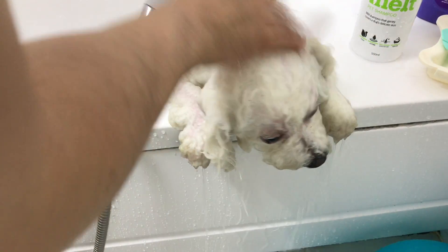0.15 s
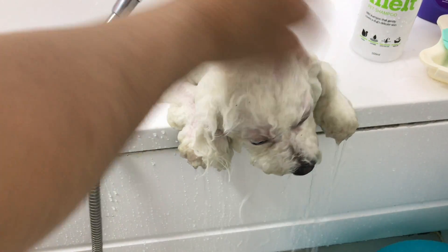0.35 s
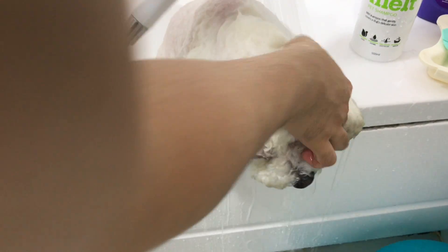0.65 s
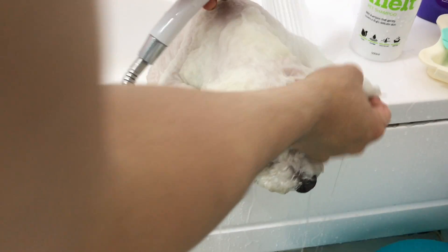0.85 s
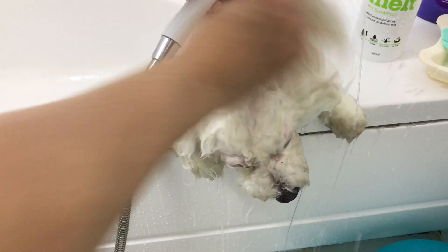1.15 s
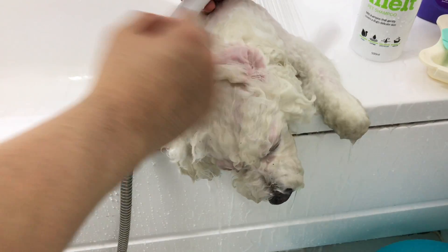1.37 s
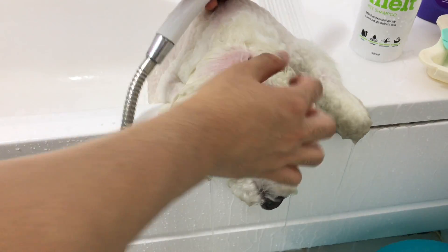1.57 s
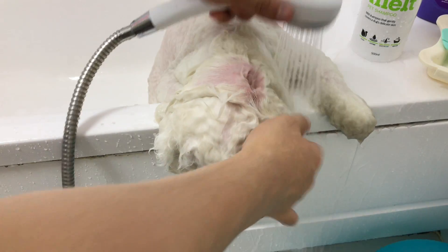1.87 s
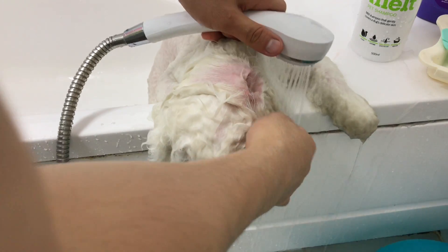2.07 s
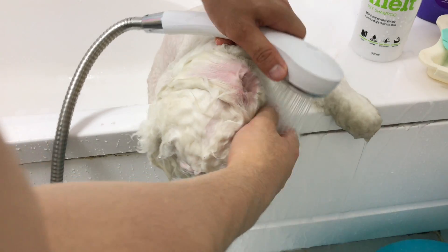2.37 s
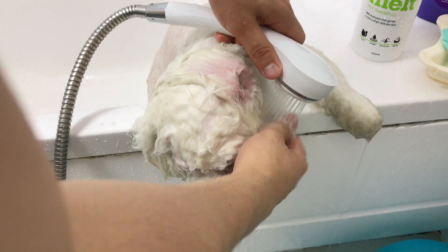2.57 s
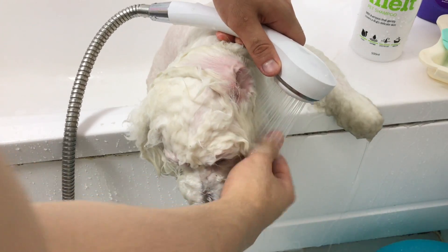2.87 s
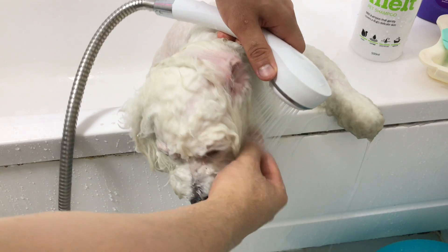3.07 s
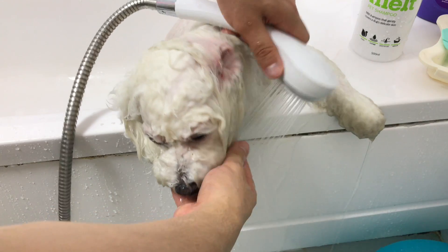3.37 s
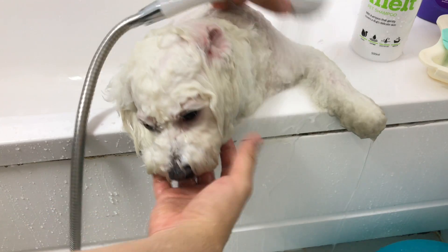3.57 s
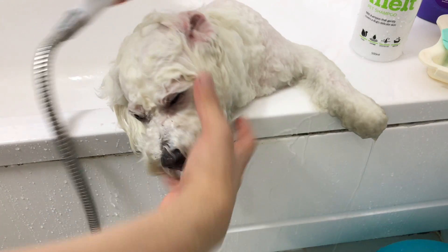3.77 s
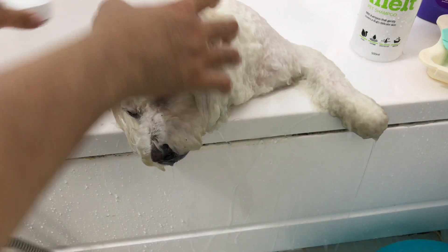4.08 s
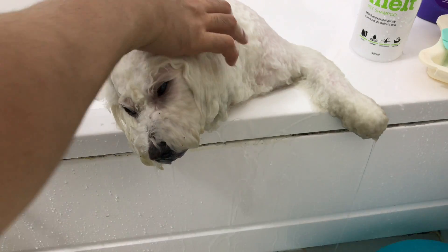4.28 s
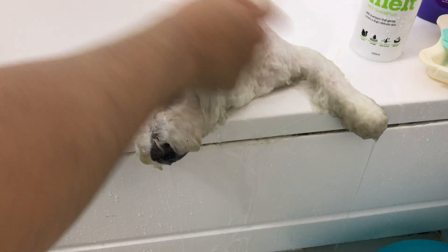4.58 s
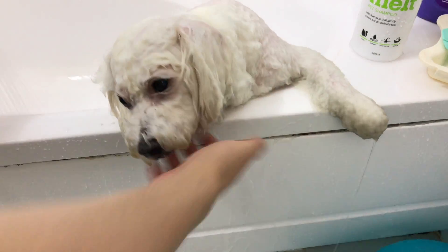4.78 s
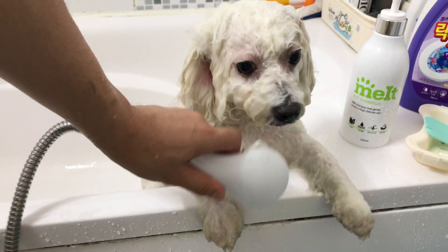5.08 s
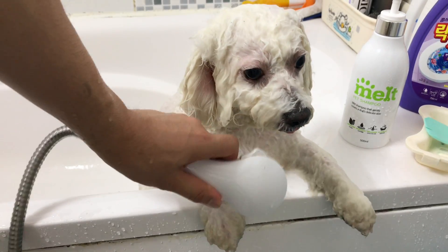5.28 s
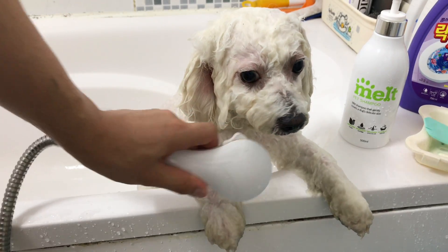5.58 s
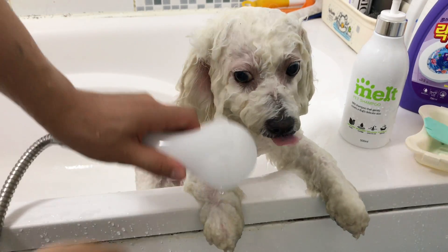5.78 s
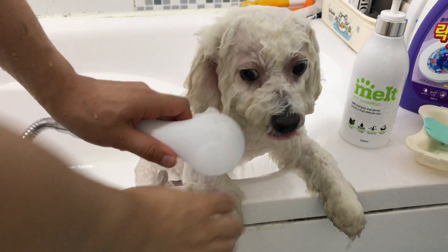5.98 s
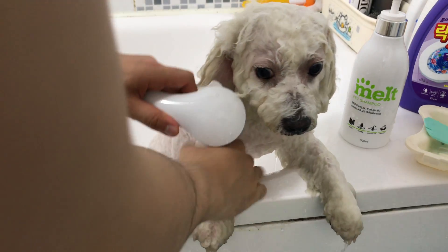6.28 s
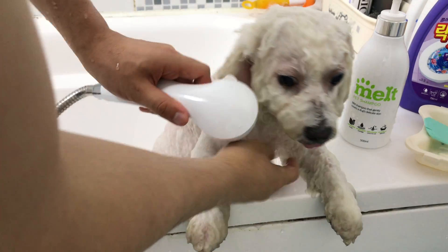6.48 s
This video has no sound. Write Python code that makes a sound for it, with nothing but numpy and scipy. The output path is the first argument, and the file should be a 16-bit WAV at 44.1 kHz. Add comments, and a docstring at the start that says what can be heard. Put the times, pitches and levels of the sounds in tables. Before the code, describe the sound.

Continuous shower spray on a small dog at a bathtub rim, heard close up and alike in both channels, with short tile echoes. Crackling splashes and hollow knocks come early, a steadier wash follows, then many wet slaps. After a very brief fade to near silence, the spray returns with a slightly ringing, duller patter on the coat, small bubbles and faint low rumble.

```python
"""A hand shower rinses a small dog at the rim of a bathtub in a tiled bathroom.
From the start nozzles hiss as shaped noise, jets patter on fur and enamel as droplet noise, and resonators
hum as the tub shell. Slaps of runoff and shell knocks crowd the first 0.8 s; slaps return from 1.4 to 4.3 s.
Near 4.9 s all fades out and in again; then fur patter rings at 2.8 kHz and no slaps follow. Bubbles gurgle,
water sloshes and a rumble lies below throughout, while sparse tile echoes answer the water."""
import sys
import numpy as np
from scipy import signal
from scipy.fft import rfft, irfft
from scipy.io import wavfile
from scipy.ndimage import uniform_filter1d

SR = 44100
rng = np.random.default_rng(int(sys.argv[2]) if len(sys.argv) > 2 else 0)


def dump_mix(stems):
    """Bounce the given channels to the path in sys.argv[1] as a 16-bit WAV at rate SR."""
    frames = np.atleast_2d(stems).T  # one column per channel
    limited = np.clip(frames, -1, 1)  # hard clip at full scale
    pcm = np.round(limited * 32767).astype(np.int16)
    wavfile.write(sys.argv[1], SR, pcm)


def level_to_linear(level):
    """Convert decibel levels to linear amplitude factors, elementwise."""
    exponent = np.asarray(level, float) / 20
    return 10 ** exponent


N = 292824  # samples
CUT_S = 4.871  # end of the fade out

# Jets on fur and hand: t/s, relative level/dB, centre f/Hz
FUR_JETS = [(0, -25, 2140), (.13, -34.5, 2000), (.3, -33.5, 2650), (.59, -33.5, 2670), (.72, -28.5, 2010),
            (1.46, -29.5, 1900), (1.9, -27.5, 1960), (1.98, -23.5, 1900), (2.14, -32.5, 1900),
            (2.42, -23.5, 2120), (2.9, -25.5, 2100), (3.08, -20.5, 2380), (3.21, -25.5, 2100),
            (3.35, -21.5, 1980), (3.5, -25.5, 2300), (3.59, -37, 2850), (3.68, -25, 2200),
            (3.82, -30, 2300), (4.01, -28.5, 2720), (4.12, -43, 2200), (4.22, -36.5, 1690),
            (4.3, -43, 1600), (4.45, -44, 2600), (4.88, -52, 2700), (4.89, -22.5, 2070), (5.14, -25, 2030),
            (5.25, -24, 2120), (6.02, -24.5, 2300), (6.4, -27, 1860), (6.64, -25.5, 1850)]


def evened(x):
    """Normalises mean power: scales to rms 1."""
    return x / np.sqrt(np.mean(abs(x) ** 2) + 1e-20)


def read(points, hz):
    """Interpolates a spectrum along logarithmic frequency, close to the ear's pitch scale."""
    f, value = np.transpose(points)
    return np.interp(np.log(hz + 1), np.log(f + 1), value)


def control(table, column, t):
    """Interpolates one column linearly in time: a slowly varying source parameter."""
    rows = np.array(table)
    return np.interp(t, rows[:, 0], rows[:, column])


def add(mix, s, sound):
    """Superposition: adds a sound to the mix at s seconds."""
    part = mix[round(s * SR):][:len(sound)]
    part += sound[:len(part)]


def band(x, hz, width):
    """Resonance of about unit gain: one complex pole, whose radius sets the bandwidth in Hz."""
    r = np.exp(-np.pi * width / SR)
    return 2 * signal.lfilter([1 - r], [1, -r * np.exp(2j * np.pi * hz / SR)], x).real


def waver(t, depth_db, top_hz):
    """Slow random modulation: sixteen sines of random phase, weaker as they get faster, depth rms in dB."""
    hz = np.geomspace(top_hz / 8, top_hz, num=16)
    turn = rng.random(16)
    sines = np.sin(2 * np.pi * (hz * t[::256, None] + turn)) / np.sqrt(hz)
    return depth_db * np.interp(t, t[::256], evened(sines.sum(axis=1)))


def shaped(x, shape_db, size, patchy_db):
    """Time-varying filtering: a dB field over frequency and time, with drifting random patches."""
    overlap = size * 3 // 4
    hz, t, z = signal.stft(x, SR, nperseg=size, noverlap=overlap)
    patches = rng.standard_normal(z.shape[::-1]).T
    patches = uniform_filter1d(patches, size=size // 64, axis=0)
    patches = evened(uniform_filter1d(patches, size=8192 // size, axis=1))
    shape = level_to_linear(shape_db(hz[:, None], t[None]) + 0 * t)
    shape = shape / np.sqrt((shape ** 2).mean(axis=0))  # the colour moves, the power stays
    z = z * shape * level_to_linear(patchy_db * patches)
    return evened(signal.istft(z, SR, nperseg=size, noverlap=overlap)[1][:N])


def droplets(per_s, spread_db, share):
    """Shot noise: random impacts of uneven size hold a share of the power over a smooth wash."""
    impacts = rng.random(N) < per_s / SR
    size = level_to_linear(spread_db * np.minimum(rng.exponential(1, N), 5)) * impacts
    # each impact fizzes for about half a millisecond
    splash = signal.lfilter([1], [1, -.95], size) * rng.standard_normal(N)
    share = np.clip(share, 0, 1)
    return np.sqrt(share) * evened(splash) + np.sqrt(1 - share) * rng.standard_normal(N)


def nozzles(t):
    """Jet breakup: fine jets split into droplets, giving a broadband bright hiss."""
    # Hiss spectrum: f/Hz, relative spectral level/dB
    hiss_spectrum = [(300, -16.5), (1500, -4.5), (4000, -2.5), (6500, 2), (9000, 1.5), (13000, 5.5),
                     (15700, 4.5)]
    # Loudness of the nozzles as the shower head turns: t/s, relative level/dB
    jet_levels = [(0, -21.5), (.13, -21), (.22, -25), (.41, -25.5), (.6, -26), (.76, -22), (1.0, -20),
                  (1.15, -23), (1.5, -22.5), (1.91, -19.5), (2.14, -23), (2.26, -18), (2.45, -20.5),
                  (2.65, -19), (3.2, -19.5), (3.67, -18), (3.92, -24), (4.2, -30.5), (4.47, -21.5),
                  (4.88, -22.5), (5.1, -20.5), (5.2, -21.5), (6.0, -22), (6.4, -23.5), (6.64, -20)]
    level_db = control(jet_levels, 1, t) + 2.0 + waver(t, depth_db=.9, top_hz=14)
    jets = droplets(per_s=3000, spread_db=4.0, share=0.19)
    return level_to_linear(level_db) * shaped(jets, lambda hz, s: read(hiss_spectrum, hz), size=512, patchy_db=1.17)


def patter(t):
    """Impact noise depends on the surface: a dull moving hump from fur and hand, brightness from enamel."""
    # Spectrum on enamel: f/Hz, relative spectral level/dB
    enamel_spectrum = [(1500, -18.5), (2800, -9), (3800, -0.5), (4500, 0.5), (6200, -7), (8000, -8),
                       (12000, -15)]
    # Jets on enamel: t/s, relative level/dB
    enamel_levels = [(0, -20.5), (.1, -20), (.2, -27), (.41, -23.5), (.59, -28.5), (.78, -28), (.9, -22),
                     (1.08, -31.5), (1.5, -28.5), (1.7, -37), (2.14, -26), (2.26, -21), (2.65, -23),
                     (2.9, -20.5), (3.4, -19.5), (3.6, -19), (3.85, -23), (4.01, -19.5), (4.16, -33),
                     (4.26, -40), (4.47, -22), (4.66, -28.5), (4.88, -27), (4.89, -34), (5.3, -28.5),
                     (5.65, -26), (6.0, -25.5), (6.3, -24), (6.64, -27)]
    gap_hz, gap_width_hz = 2760, 130

    def gap_db(hz):
        # with the head held close to the coat the gap rings and the patter ends in an edge
        ring = 3.5 * np.exp(-((hz - gap_hz) / gap_width_hz) ** 2)
        edge = -2.5 * np.clip((hz - gap_hz) / (2 * gap_width_hz), 0, 1)
        return ring + edge

    def fur_db(hz, s):
        octaves = abs(np.log2((hz + 30) / control(FUR_JETS, 2, s)))
        return -10. * octaves ** 1.55 + gap_db(hz) * (s > CUT_S)

    fur_level_db = control(FUR_JETS, 1, t) - 0.68 + waver(t, depth_db=0.64, top_hz=14)
    fur_drops = droplets(per_s=1500, spread_db=2.8, share=0.17)
    fur = level_to_linear(fur_level_db) * shaped(fur_drops, fur_db, size=512, patchy_db=1.37)
    enamel_level_db = control(enamel_levels, 1, t) - 3.0 + waver(t, depth_db=1.6, top_hz=14)
    enamel_drops = droplets(per_s=1500, spread_db=3.7, share=0.4)
    enamel = shaped(enamel_drops, lambda hz, s: read(enamel_spectrum, hz), size=512, patchy_db=2.5)
    return fur + level_to_linear(enamel_level_db) * enamel


def slaps():
    """Sheet impact: a crack and a short rising pop, a bounce off the tub wall, then thinning spray."""
    # Slaps of falling water: t/s, relative pop level/dB, nominal bubble f/Hz,
    # crack level relative to the pop/dB, initial spray level relative to the pop/dB
    slap_events = [(0.0942, -8, 6060, 0, -21), (0.13, -9, 6000, -8, -18), (0.172, -8, 7340, -8, -16),
                   (0.1852, -7, 3680, -11, -15), (0.2098, -10, 2520, -13, -28), (0.2224, -7, 2960, -6, -15),
                   (0.238, -12, 2760, -2, -23), (0.3584, -12, 6340, -8, -19), (0.369, -2, 2650, -9, -17.5),
                   (0.371, -10.5, 1610, -14, -16), (0.461, 0.5, 11040, -5.5, -25),
                   (0.543, -17, 3830, -8, -8), (0.5623, -10.5, 5890, -9, -14),
                   (0.606, -10.5, 2870, -10, -16), (0.7289, -2.5, 4760, -10, -19.5),
                   (1.4321, -14.5, 1660, 2, -14), (2.1558, -10.5, 7020, -11, -9),
                   (2.3171, -11.5, 3910, -8, -12), (2.3992, -9, 5800, -6, -15), (2.511, -10, 2260, -1, -14),
                   (2.622, -4, 3600, -14, -16), (2.7364, -5, 3740, 0, -19), (2.894, -1, 6000, -17, -21),
                   (2.9164, 0.5, 3550, -15, -14), (2.939, -3, 5340, -20, -17), (3.0377, -6, 3620, -15, -14),
                   (3.0475, -2, 2920, -8, -15), (3.1896, -5, 3870, -8, -22), (3.262, -5.5, 3500, -16, -26),
                   (3.3255, -0.5, 3130, -13, -20), (3.328, -5, 1500, -10, -18), (3.429, -10, 2900, -8, -18),
                   (3.3474, -14, 2240, -5, -21), (3.499, -6.5, 4350, -15, -12), (3.605, -7, 3960, -10, -13),
                   (3.6997, -8.5, 4150, -4, -8), (3.7984, -8.5, 5570, -7, -25),
                   (3.8339, -8.5, 3030, -3.5, -18), (3.94, 0, 3030, -17, -12.5),
                   (4.0316, -10, 3630, -8, -22), (4.061, -9, 9400, -7, -19), (4.091, -16, 5500, -8, -20),
                   (4.25, -19, 6000, -8, -21)]
    out = np.zeros(N)
    u = np.arange(SR // 4) / SR
    rise = 1 - np.exp(-u / 0.00028)
    noise = rng.standard_normal((len(slap_events), len(u)))
    for (s, db, hz, crack_db, spray_db), n in zip(slap_events, noise):
        cycles = hz * u * (.9 + 60 * np.minimum(u, .004))
        pop = 1.23 * np.sin(2 * np.pi * cycles) * np.exp(-u / 0.0012)
        crack = level_to_linear(crack_db) * evened(band(band(n, 6000, 5900), 6400, 6000)) * np.exp(-u / 0.0021)
        spray = evened(band(band(n, 1.7 * hz, 1.0 * hz), 1.16 * hz, 0.76 * hz))
        spray = spray * level_to_linear(spray_db - 60 * u / 0.13)  # 60 dB of decay in 0.13 s
        add(out, s, level_to_linear(db) * rise * (pop + crack + spray))
        add(out, s + 0.0027, level_to_linear(db - 8) * rise * (pop + crack))  # the bounce
    # thin sheets move little bass
    return signal.sosfilt(signal.butter(2, 900, "high", fs=SR, output="sos"), out)


def bubbles(low_hz, high_hz, per_s, cycles):
    """Bubble resonance: trapped air rings briefly, rising in pitch, at a frequency set by its size."""
    out = np.zeros(N)
    count = 24  # bubble sizes
    for hz in np.geomspace(low_hz, high_hz, count):
        u = np.arange(round(3 * cycles * SR / hz)) * hz / SR  # time in cycles
        ring = np.sin(2 * np.pi * u * (1 + 0.00616 * u)) * np.exp(-u / cycles) * (1 - np.exp(-u / 0.33))
        births = rng.random(N) < per_s / count / SR
        train = level_to_linear(3.44 * np.minimum(rng.exponential(1, N), 4)) * births
        out += signal.oaconvolve(train, ring)[:N]
    return evened(out)


def pool(t):
    """Free-surface agitation: water in the tub sloshes as moving band noise and gurgles with bubbles."""
    # Slosh spectrum, referred to a centre of 900 Hz: f/Hz, relative spectral level/dB
    slosh_spectrum = [(250, -15.5), (450, -9), (700, -3.5), (900, 2), (1200, -1.5), (2000, -22.5)]
    # Water in the tub: t/s, relative level/dB, centre f/Hz
    pool_levels = [(0, -37, 920), (.1, -29.5, 960), (.41, -42, 860), (.59, -42, 960), (.7, -31.5, 1050),
                   (.82, -30, 850), (.86, -24, 840), (.94, -27.5, 850), (1.0, -33, 990), (1.22, -33.5, 990),
                   (1.46, -31, 940), (1.66, -33, 950), (1.91, -31.5, 810), (2.35, -34, 1060),
                   (2.65, -42, 1090), (3.0, -35.5, 1060), (3.21, -37, 1000), (3.31, -34, 1090),
                   (3.56, -54, 1080), (3.68, -34, 1050), (3.81, -38, 850), (3.92, -57, 740),
                   (4.2, -42, 900), (4.88, -50, 950), (5.11, -30.5, 1140), (5.19, -38.5, 1110),
                   (5.53, -41, 1090), (5.66, -35.5, 997), (5.9, -32.5, 950), (5.95, -23.5, 1030),
                   (6.08, -34, 1050), (6.25, -40, 1080), (6.39, -40, 1090), (6.5, -28.5, 1050),
                   (6.64, -34, 1080)]

    def slosh_db(hz, s):
        return read(slosh_spectrum, hz * 900 / control(pool_levels, 2, s))

    slosh = shaped(rng.standard_normal(N), slosh_db, size=1024, patchy_db=2.)
    gurgle = bubbles(low_hz=501.4, high_hz=1469, per_s=150, cycles=14.0)
    level_db = control(pool_levels, 1, t) + waver(t, depth_db=1.44, top_hz=12)
    return level_to_linear(level_db) * (0.79 * slosh + 0.22 * gurgle)


def tub(t):
    """Modal vibration: running water drives a wavering hum, knocks a decaying boom; a rumble lies below."""
    # Shell modes: f/Hz, bandwidth of the narrower of two resonators/Hz, relative level/dB
    shell_modes = [(232, 5.5, -1.5), (267.4, 20, -8.5), (323.7, 27, -7.5)]
    # Knocks on the shell: t/s, relative level/dB
    knock_events = [(0.21, -28.5), (0.757, -18), (0.794, -26)]
    # Water running hard on the shell swells its hum:
    # start t/s, relative level/dB, hold/s, rise over 20 dB/s, fall over 20 dB/s
    swell_events = [(.2, -42, .04, .05, .5), (0.753, -29, .06, 0.011, 0.03), (1.863, -32, 0.11, 0.11, 0.09),
                    (2.424, -45.5, 0.18, 0.12, 0), (3.2, -43, 0.055, .05, 0.07),
                    (3.718, -45.5, 0.19, .1, 0.3), (4.57, -46.5, 0.046, .2, 0.5),
                    (6.1, -39, 0.052, 0.14, 0), (6.32, -36, 0.14, 0.091, .3)]
    # Rumble spectrum: f/Hz, relative spectral level/dB
    rumble_spectrum = [(30, -35), (60, 7), (76, 0), (100, -9), (140, -0.5), (170, -3.5), (350, -3.5),
                       (600, -32)]
    # Rumble: t/s, relative level/dB
    rumble_levels = [(0, -65), (.41, -40.5), (.58, -54), (.8, -52), (1.2, -62), (1.45, -55), (1.66, -66),
                     (1.8, -42), (1.93, -43), (2.2, -59), (2.45, -45), (2.95, -62), (3.28, -52),
                     (3.55, -61), (3.9, -54), (4.16, -42.5), (4.5, -51), (4.66, -48), (5.12, -57),
                     (5.52, -45.5), (5.9, -43), (6.5, -42), (6.64, -49)]

    drive = rng.standard_normal(N)
    tones = []
    for hz, width, db in shell_modes:
        mode = signal.hilbert(band(band(drive, hz, width), hz, 3 * width))
        steadied = (mode / abs(mode) ** .75).real  # a steady flow evens the swells
        tones.append(level_to_linear(db) * evened(steadied))
    low, upper = tones[0], sum(tones[1:])

    swells = np.zeros(N)
    for s, db, hold, rise, fall in swell_events:
        outside = np.maximum((s - t) / rise, (t - s - hold) / fall)
        swells += level_to_linear(db - 20 * np.maximum(outside, 0))
    hum = level_to_linear(-54 + waver(t, depth_db=4., top_hz=11)) * (low + upper)
    # the swells reach the upper modes less
    hum += swells * level_to_linear(waver(t, depth_db=1.3, top_hz=16)) * (low + level_to_linear(-6.5) * upper)

    u = np.arange(SR // 4) / SR
    boom = sum(level_to_linear(db) * np.sin(2 * np.pi * hz * u) for hz, width, db in shell_modes[:2])
    boom = boom * (1 - np.exp(-u / 0.0021)) * np.exp(-u / 0.027)
    for s, db in knock_events:
        add(hum, s, level_to_linear(db) * boom)

    rumble = shaped(rng.standard_normal(N), lambda hz, s: read(rumble_spectrum, hz), size=4096, patchy_db=1.5)
    return hum + level_to_linear(control(rumble_levels, 1, t) + waver(t, depth_db=2.5, top_hz=9)) * rumble


def room(x):
    """Reverberation: sparse echoes off tiles, each frequency band decaying at its own rate."""
    # Reverberation: f/Hz, time for 60 dB of decay/s
    decay_times = [(500, 0.63), (3000, 0.34), (12000, .25)]
    taps = np.zeros(SR // 2)
    count = (SR // 2 - 201) // 20
    places = np.arange(200, SR // 2 - 20, 20) + rng.integers(0, 20, count)  # one echo in every 20 samples
    taps[places] = rng.choice([-1., 1.], count)
    hz, t, z = signal.stft(taps, SR, nperseg=256)
    decay = level_to_linear(-60 * t / read(decay_times, hz)[:, None])
    tail = signal.istft(z * decay, SR, nperseg=256)[1]
    return signal.fftconvolve(x, tail / np.linalg.norm(tail))[:N]


def fade(t):
    """Amplitude envelope: a linear fade out cut off at a low level, then a curved fade in, over a floor."""
    out = np.clip((CUT_S - t) / .14 + level_to_linear(-29), 0, 1) * (t < CUT_S)
    back = np.clip((t - 4.886) / 0.15, 0, 1) ** 1.43
    return np.maximum(out + back, level_to_linear(-62))


def scene():
    """Superposition of direct and reverberant sound at one microphone, alike in both channels."""
    t = np.arange(N) / SR
    fur_bubbles = bubbles(low_hz=1203, high_hz=7120, per_s=200, cycles=8.5)
    hits = slaps() + level_to_linear(control(FUR_JETS, 1, t) - 8.5) * fur_bubbles
    slosh = pool(t)
    water = nozzles(t) + patter(t)
    echoes = room(level_to_linear(-4.5) * hits + level_to_linear(-11) * water + level_to_linear(-5.5) * slosh)
    mix = water + slosh + hits + tub(t) + echoes
    return np.array([mix, mix])


def roll_off(x):
    """The treble ends steeply here."""
    return signal.sosfilt(signal.butter(12, 17100, fs=SR, output="sos"), x)


def record(dry):
    """Linear filtering by a fixed colour, then the fade, a clipping ceiling and band limits."""
    # Fixed colour of the whole sound, humps and notches, the deepest near 5, 7.8 and 10.4 kHz:
    # f/Hz, width/Hz, level/dB
    fixed_colour = [(1550, 61, 1), (2220, 200, 0), (2800, 120, 1.5), (3000, 150, 0), (4930, 410, -3.5),
                    (6520, 190, 1), (7760, 350, -3), (10420, 500, -3.5), (15300, 700, 2.5)]
    # Air modes of the tub: f/Hz, width/Hz, level/dB
    air_modes = [(531, 11, 4.5), (597, 25, 0.5), (720, 24, 1.5), (910, 19, 0.5), (1060, 24, 2.5)]
    low_hz, edge_hz = 45, 15850
    hz = np.fft.rfftfreq(N, 1 / SR)
    colour_db = np.zeros(len(hz))
    for rows in (fixed_colour, air_modes):
        for f, width, db in rows:
            colour_db += db * np.exp(-((hz - f) / width) ** 2)
    coloured = irfft(rfft(dry) * level_to_linear(colour_db), N)
    faded = coloured * fade(np.arange(N) / SR)
    low_cut = (hz / low_hz) ** 3 / (1 + (hz / low_hz) ** 3)
    high_cut = np.clip((edge_hz - hz) / 100, 0, 1)
    finished = irfft(rfft(np.clip(faded, -1, 1)) * low_cut * high_cut, N)
    return roll_off(finished)


dry = scene()
out = record(dry)
dump_mix(out)
```